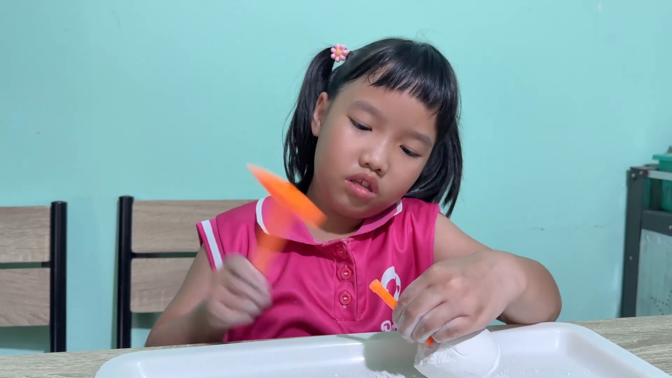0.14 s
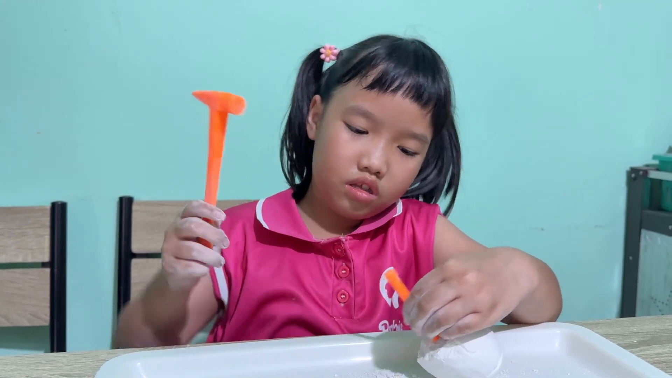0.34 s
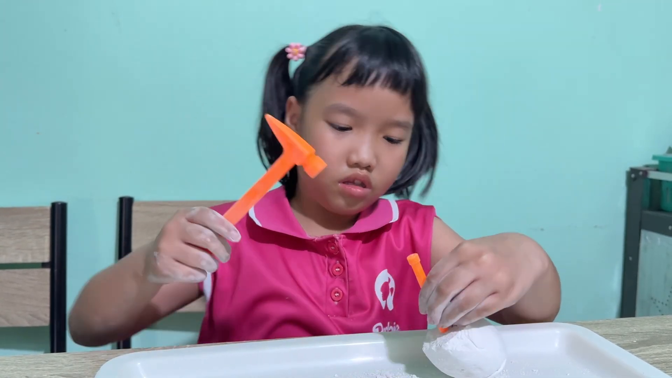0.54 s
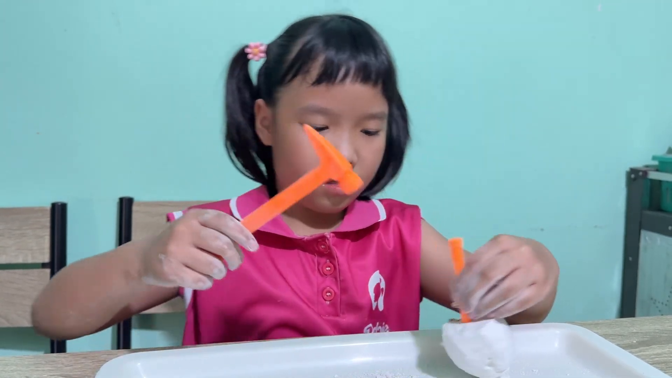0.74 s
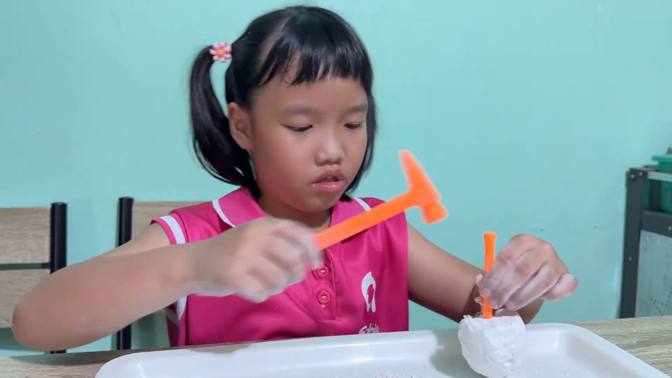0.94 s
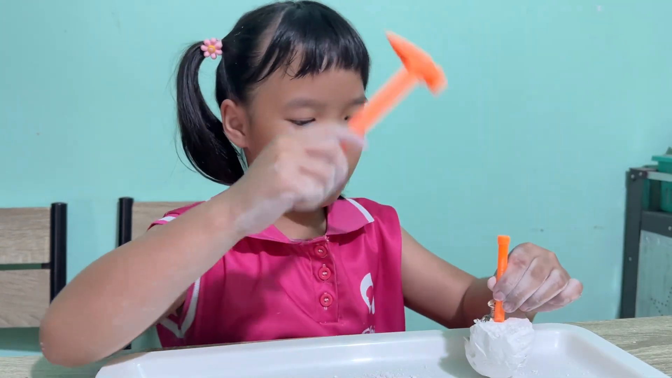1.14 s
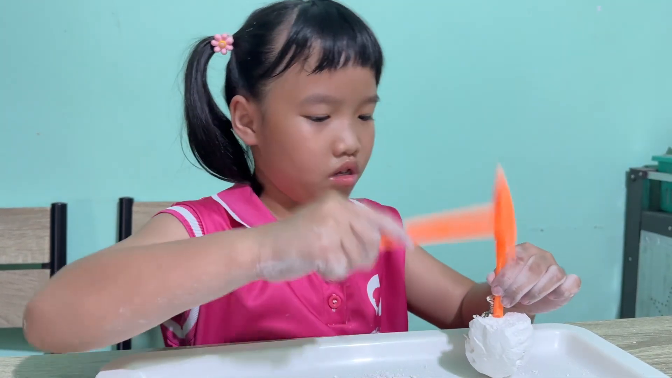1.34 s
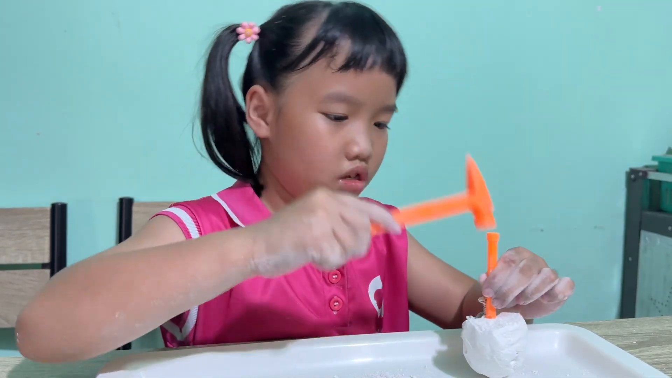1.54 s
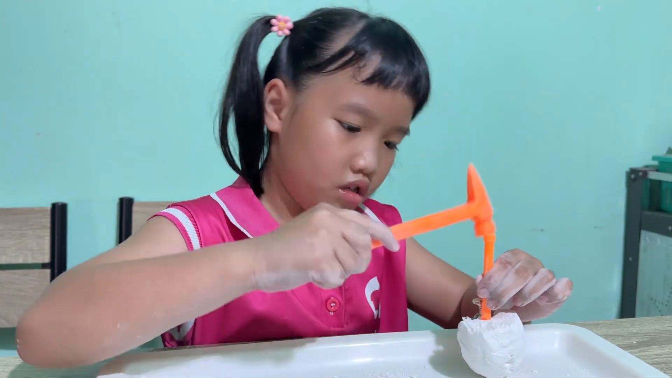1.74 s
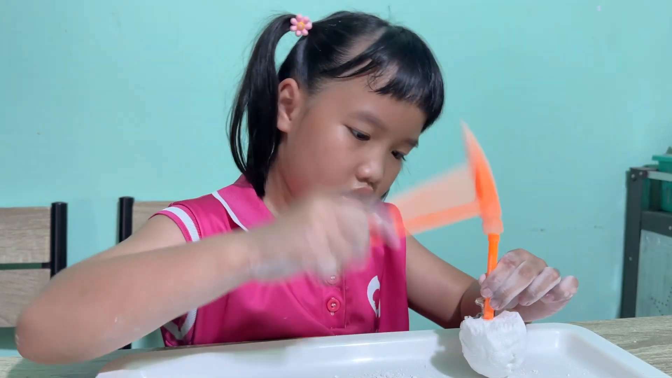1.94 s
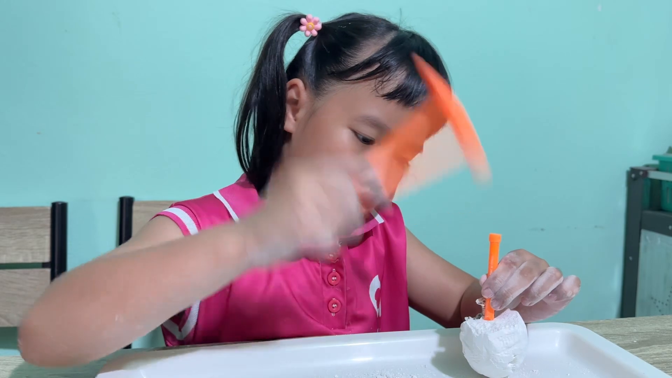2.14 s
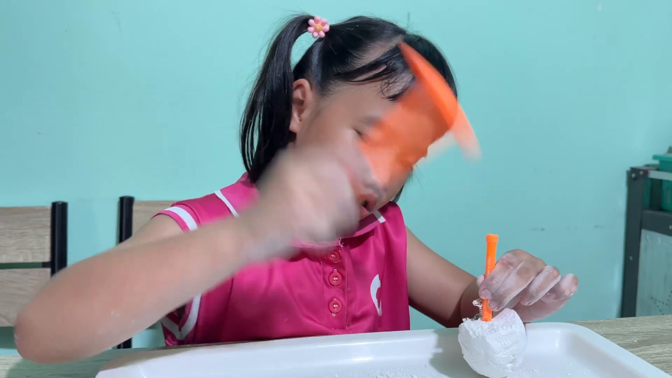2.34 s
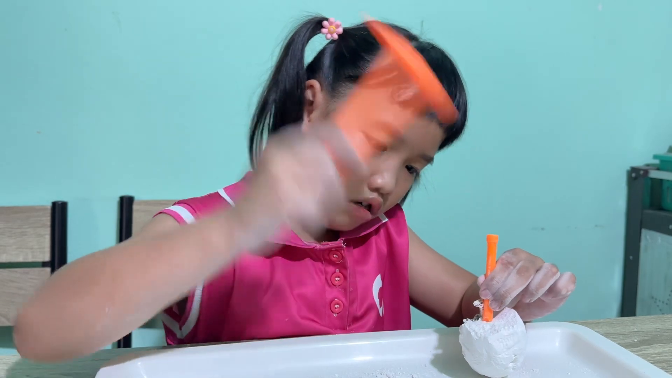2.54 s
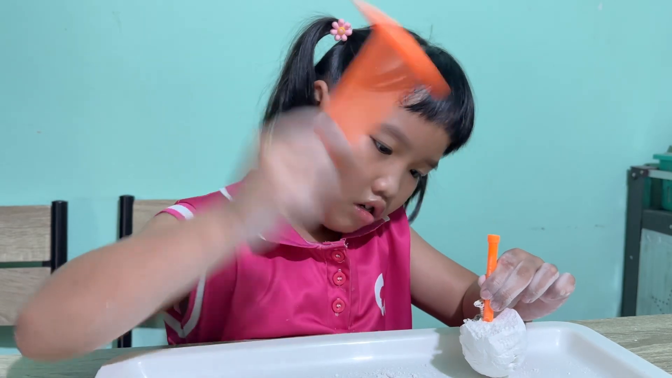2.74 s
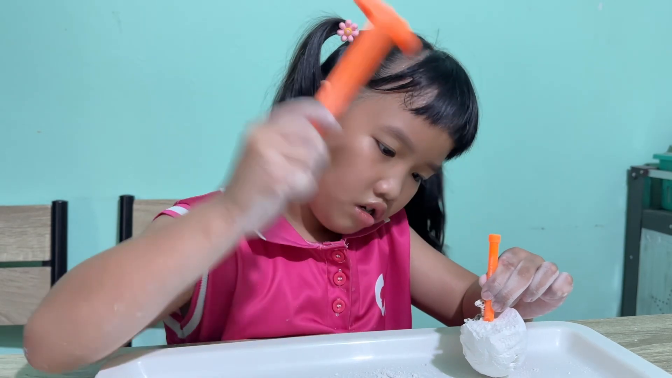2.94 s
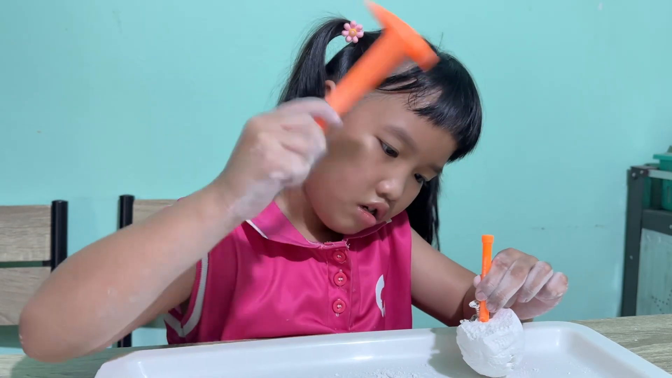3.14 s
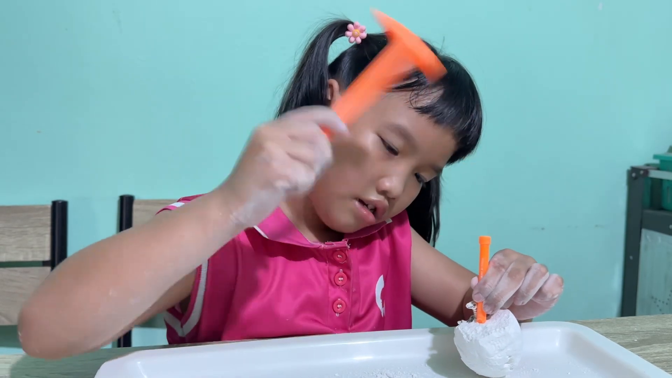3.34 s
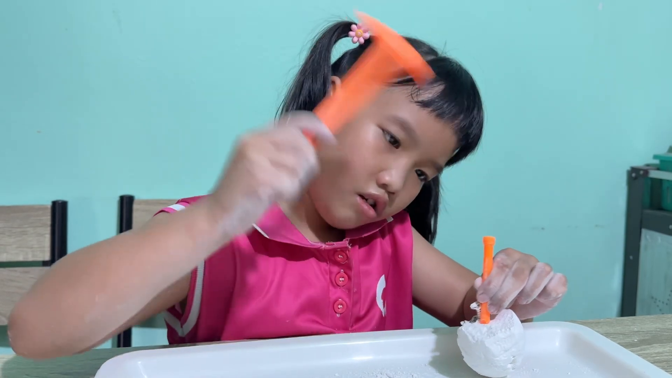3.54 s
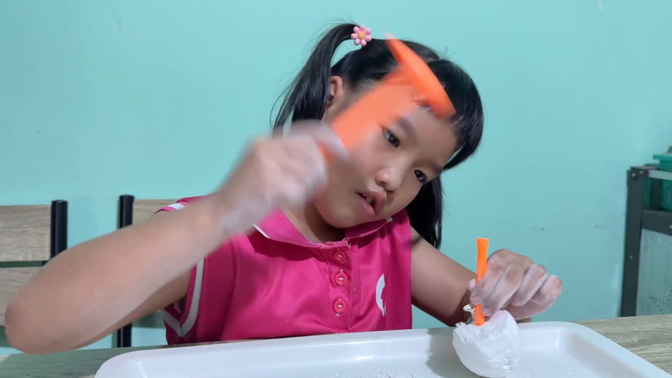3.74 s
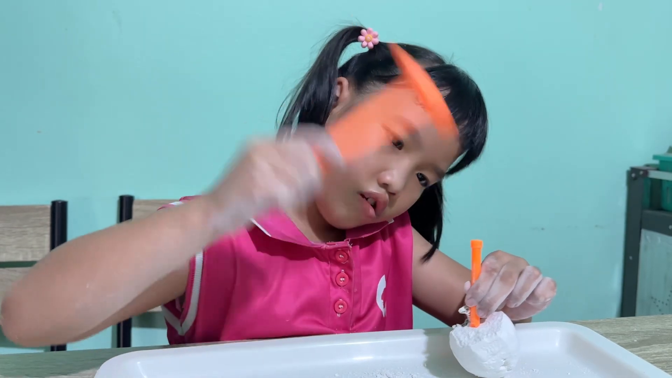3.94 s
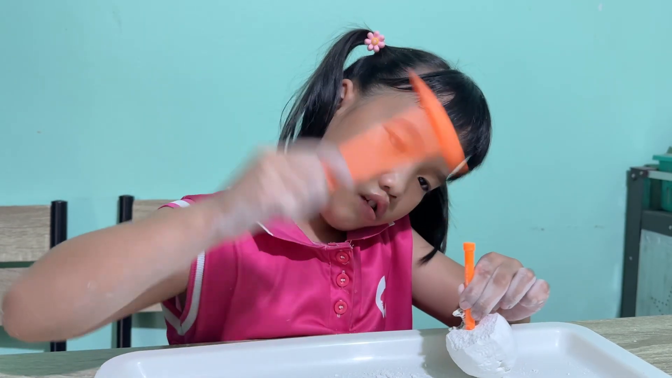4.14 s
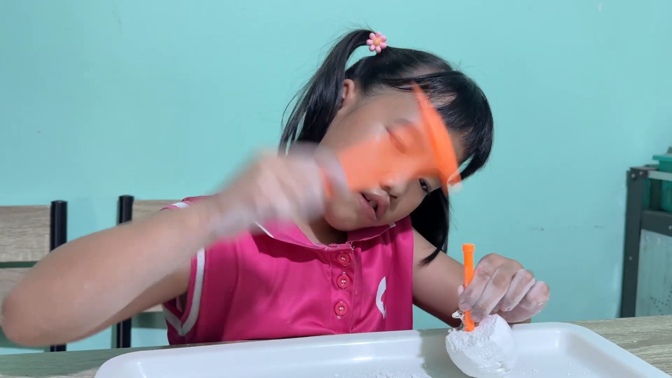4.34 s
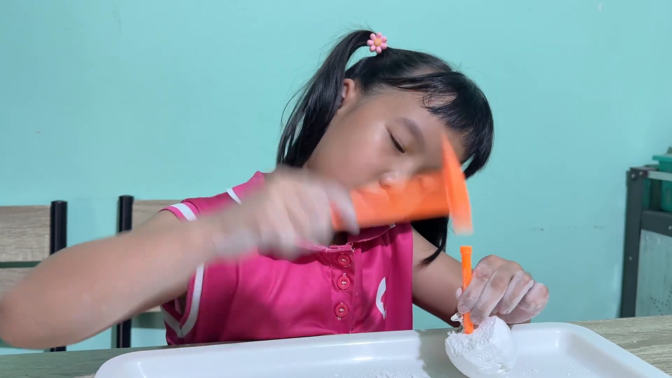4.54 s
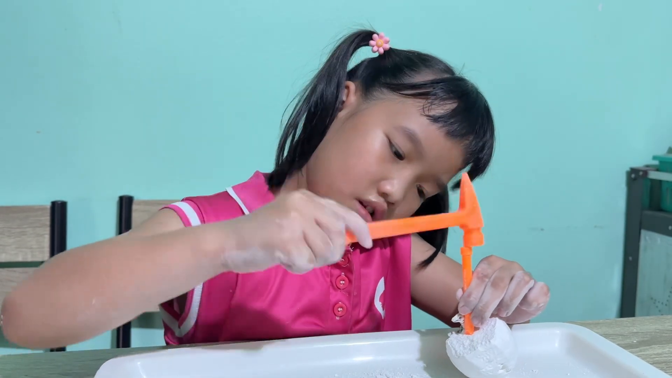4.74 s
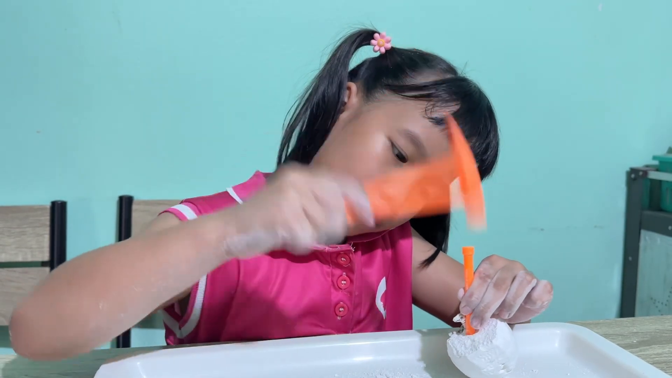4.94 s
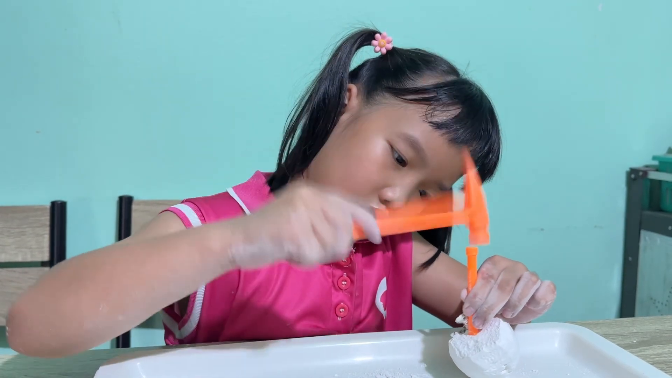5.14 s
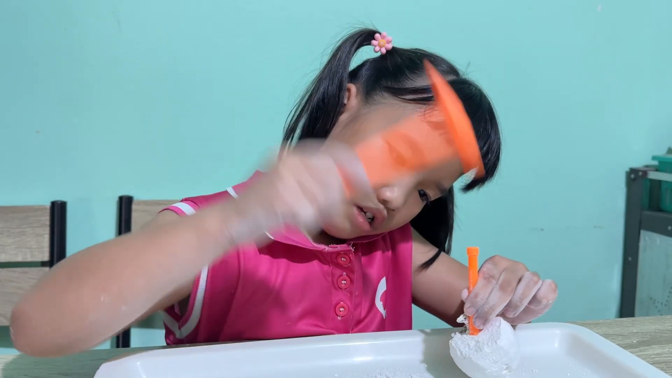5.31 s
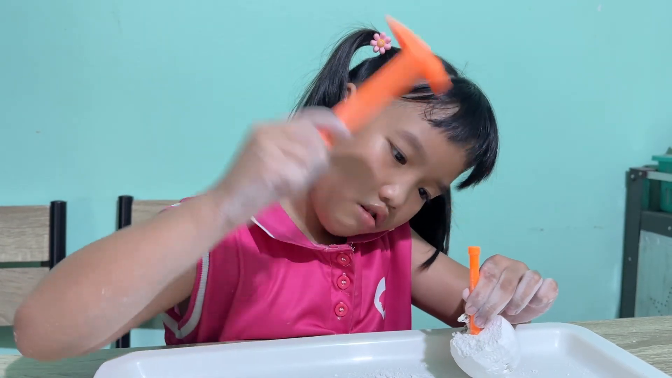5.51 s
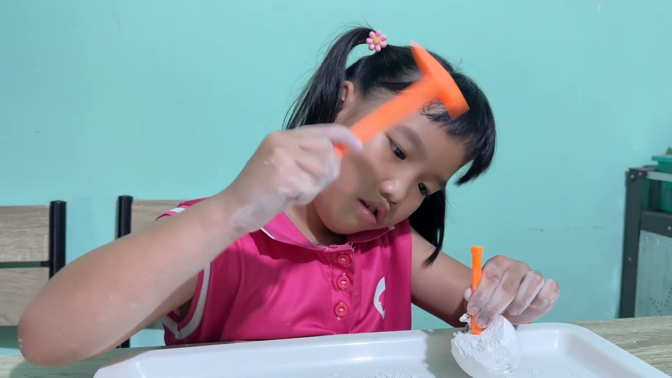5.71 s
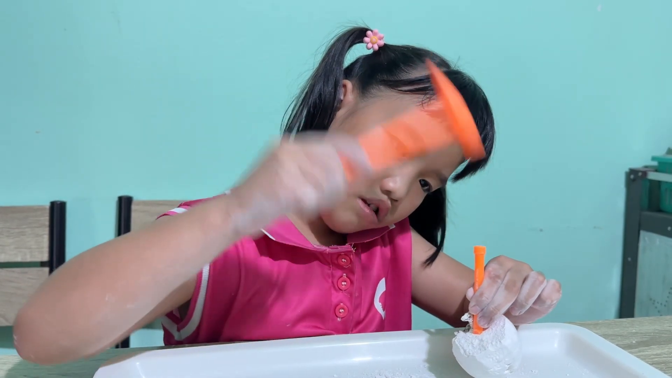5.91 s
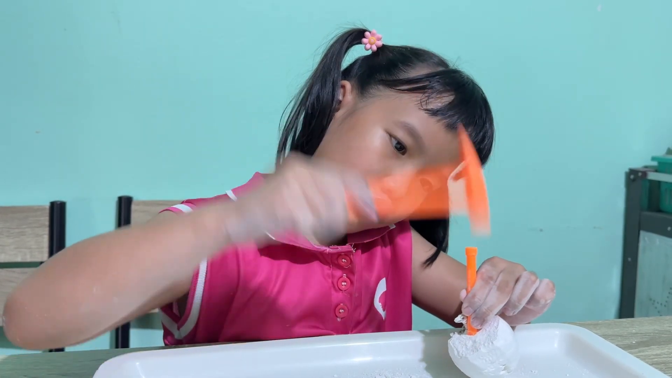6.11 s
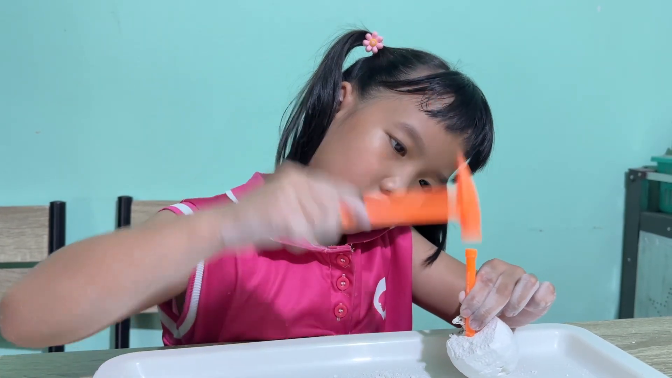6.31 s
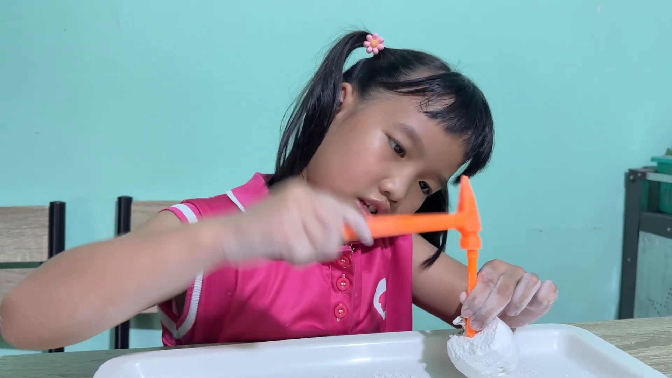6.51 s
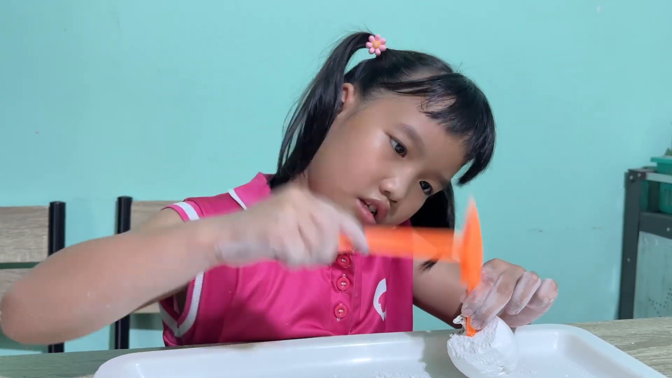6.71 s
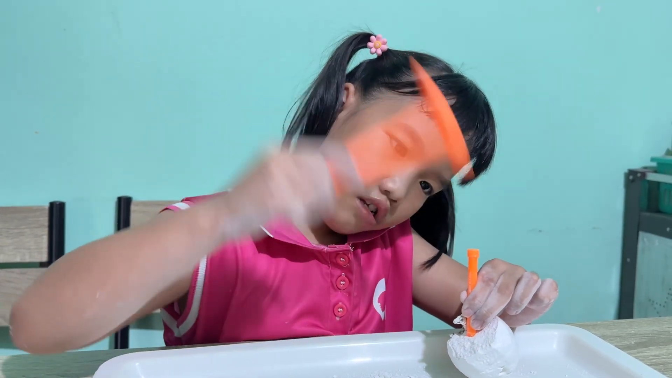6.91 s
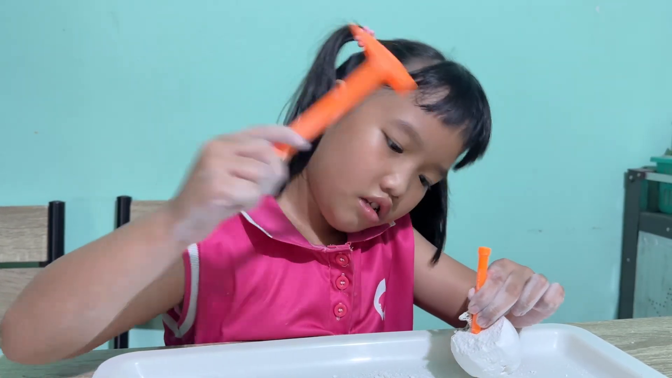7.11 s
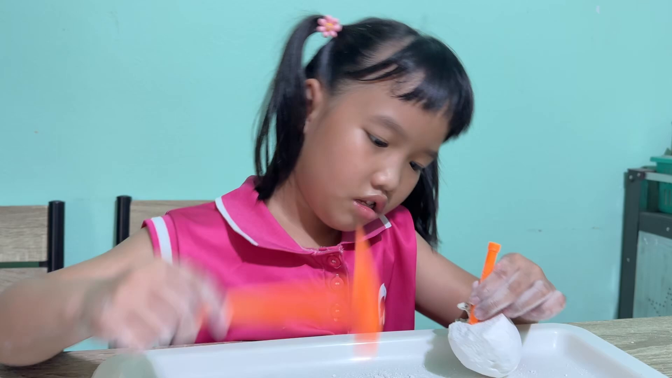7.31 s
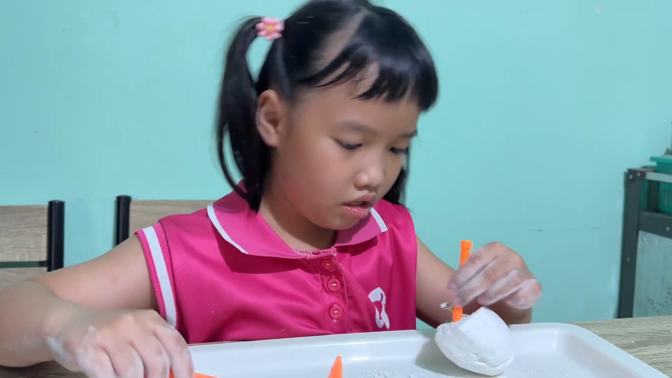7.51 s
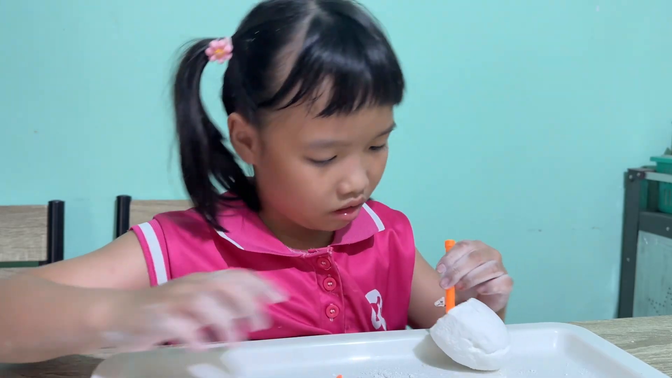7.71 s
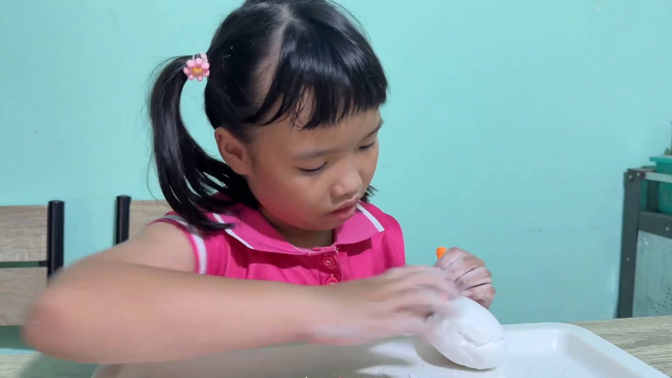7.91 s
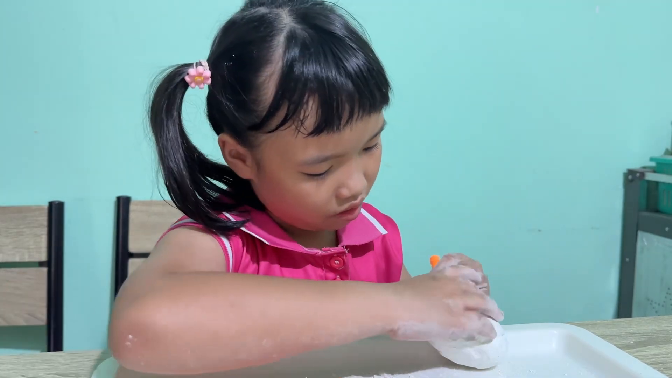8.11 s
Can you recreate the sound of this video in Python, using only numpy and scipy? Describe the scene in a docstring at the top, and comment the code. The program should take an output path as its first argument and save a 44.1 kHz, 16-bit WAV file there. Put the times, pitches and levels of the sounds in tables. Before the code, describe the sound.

Brisk hollow plastic taps on a chisel held against a plaster egg, about five per second, over faint room hum, ending in loose knocks.

```python
"""Over room air and a motor hum, a toy plastic hammer taps a plastic chisel held on a plaster egg in a plastic tray.
Each tap sums decaying modes: a dry click of the tools, a hollow knock of the tray and a thud of the table top.
After the first tap the egg is shifted with a dull rub of filtered noise; the taps then go on, the egg settling.
Loose knocks, each with faint later touches, sound once among the taps and at the end as the hammer is put down.
A small bare room answers taps and knocks with a tail of decaying noise."""
import sys
import numpy as np
from scipy import signal
from scipy.fft import rfft, irfft
from scipy.io import wavfile
from scipy.ndimage import uniform_filter1d

SR = 44100
rng = np.random.default_rng(int(sys.argv[2]) if len(sys.argv) > 2 else 0)


def log_audio(samples):
    """Write samples as a 16-bit WAV file to the path given in sys.argv[1]."""
    # one column per channel
    frames = np.atleast_2d(samples).T
    # limit to full scale, then quantise
    limited = np.clip(frames, -1, 1)
    pcm = np.round(limited * 32767).astype(np.int16)
    wavfile.write(sys.argv[1], SR, pcm)


N = 359856

# Steady room air. Each row: frequency in Hz, relative spectral density in dB per Hz.
AIR_SPECTRUM = [(15, -35), (25, -22), (54, -6.5), (71, -18.5), (106, -17.5), (125, -19.5), (207, -22),
                (224, -26.5), (301, -22), (373, -38), (1150, -34.5), (1630, -44), (6540, -58),
                (8550, -67.5), (15000, -74.5)]
# Partials of the motor hum. Each row: frequency in Hz, level in dB before panning.
HUM_PARTIALS = [(48.8, -43), (100.5, -48), (146, -57.5), (199, -61.5)]
# Stereo width set for air, rub and room tail. Each row: frequency in Hz, left-right correlation
# (limited to -1..1 when used).
STEREO_CORRELATION = [(50, 0.88), (250, 0.85), (600, 0.27), (1200, 0.31), (1800, 0.35), (3000, 0.34),
                      (6800, 0.1), (8500, -1.18), (11000, -2.5), (15000, 5.2)]
# Stereo balance set for air, rub and room tail. Each row: frequency in Hz, left-right level difference in dB.
STEREO_BALANCE = [(100, 0.5), (500, 2.5), (900, -1), (2500, 1), (4000, 2), (6000, 9), (9000, 0.5),
                  (15000, 2)]

# Taps on the chisel. Each row: start in seconds, relative force passed into the egg in dB,
# relative level of the tools' click in dB, sharpness of the click from 8 kHz up in dB.
TAPS = [(0.0381, -32.5, -30, 6.5), (1.3195, -55, -46.5, -1), (1.3503, -55, -56.5, 1),
        (1.5242, -34, -33.5, -3.5), (1.7275, -20.5, -28.5, -3.5), (1.9534, -23, -27, -2.5),
        (2.171, -23.5, -26, 0.5), (2.3766, -23.5, -26.5, 0.5), (2.5863, -19.5, -27.5, 3),
        (3.0196, -37.5, -31.5, -5), (3.238, -21, -27.5, 1.5), (3.4367, -21, -27, 1.5),
        (3.6426, -19.5, -26.5, 2), (3.8478, -17, -25.5, 1), (4.0653, -19.5, -27, 1),
        (4.2745, -20, -26.5, 4), (4.4855, -18, -25, 5.5), (4.7291, -16.5, -27.5, 1),
        (4.9673, -25.5, -38, -10), (5.1503, -18.5, -31, -1.5), (5.3499, -20.5, -29, -1),
        (6.044, -27.5, -28, 6), (6.2634, -18, -25.5, 0), (6.4801, -16.5, -26, -1),
        (6.6922, -55, -41.5, 8.5), (6.9474, -19.5, -28, -1)]
# Modes of hammer and chisel. Each row: frequency in Hz, relative energy in dB, t60 in seconds,
# left-right level difference in dB.
TOOL_MODES = [(780, -7, 0.0011, -10), (1588, -2.5, 0.013, -8.5), (1935, 1.5, .012, -4),
              (2570, -2, 0.0025, -6), (3166, -2.5, 0.0078, -1), (4357, 0.5, 0.0025, 0.5),
              (4996, 3, 0.0065, -0.5), (5580, -5.5, 0.0022, -13), (6850, 0, 0.0035, -0.5),
              (8150, -10.5, 0.0038, 1), (9060, -13.5, 0.0048, 12), (12000, -12.5, 0.00087, 16),
              (12350, -10.5, 0.006, -11), (15000, -9, 0.00347, 4.5)]
# Modes of the tray under the egg. Each row: frequency in Hz, relative energy in dB, t60 in seconds,
# left-right level difference in dB.
TRAY_MODES = [(388, -12, 0.036, -2), (516.4, -20, 0.23, -10), (530.4, 5, 0.066, -3),
              (589.4, -3, 0.0643, 1.5), (651.3, -2, 0.043, 10), (699, -16.5, 0.018, -0.5),
              (839, -17, 0.097, -7.5), (896, -19, 0.091, -15.5), (1045, -10.5, 0.029, -13),
              (1232, -12.5, 0.037, 2.5), (1700, -17.5, 0.015, -5.5), (2020, -30, 0.038, 8)]
# Modes of the table top. Each row: frequency in Hz, relative energy in dB, t60 in seconds,
# left-right level difference in dB.
TABLE_MODES = [(96, -14, 0.32, -7.5), (106.3, -5, .2, -5.5), (135.7, -3.5, 0.24, 8.5),
               (198.6, -2, 0.14, 7.5), (230.5, -9, 0.13, 13.5), (259.4, -7, 0.082, -9.5),
               (310.5, 1.5, 0.069, -0.5), (353.3, -12, 0.17, 0), (387, -12, 0.082, -21.5),
               (475.6, -8.5, 0.25, 4.5)]
# Level of the tools' modes up to about 2 kHz, which follows the grip. Each row: time in seconds, level in dB.
GRIP_LEVEL = [(0, -4.5), (1.35, -15), (1.75, -1.5), (2.4, -1.5), (3, 3), (4.5, 1.5), (5.1, 5), (6.05, 3),
              (6.7, -3.5), (6.95, 0.5)]
# Effect of the egg lying off the middle on tray and table modes. Each row: frequency in Hz, gain in dB.
OFFSET_COLOUR = [(100, 5.5), (200, 2.5), (300, -3), (420, -4.5), (520, 0), (670, -1.5), (850, -3),
                 (1300, 6)]
# After-ring of the hammer's hollow head. Each row: frequency in Hz, relative energy in dB, t60 in seconds,
# left-right level difference in dB.
HEAD_MODES = [(1722, -1.5, .07, -4), (2027, 2.5, 0.13, -8.5), (1983, 5.5, 0.14, -0.5),
              (2998, 3.5, 0.28, 8.5), (3185, -16.5, 0.15, 4)]

# Level of the room tail. Each row: frequency in Hz, relative gain in dB.
ROOM_GAIN = [(60, -11), (200, -4.5), (450, -2.5), (900, -1), (2000, -5.5), (4000, -3), (6500, -6),
             (9000, 3), (12000, 1), (16000, -4.5)]
# Decay of the room tail. Each row: frequency in Hz, t60 in seconds.
ROOM_T60 = [(100, 0.38), (500, 0.41), (2000, 0.39), (5000, 0.43), (9000, 0.38), (15000, 0.25)]
# Rub of the shifted egg. Each row: frequency in Hz, relative spectral density in dB per Hz.
RUB_SPECTRUM = [(50, -33), (110, -1.5), (180, -4.5), (260, -16), (600, -15.5), (1500, -36), (4000, -60),
                (12000, -74)]
# Loose knocks on the table, loudest when the hammer is laid down. Each row: start in seconds, level in dB,
# hardness of the contact as the gain of the modes above 3.5 kHz in dB.
KNOCKS = [(5.8129, -42.5, -5), (7.394, -26.5, -12), (7.5946, -26, 0), (7.7391, -39.5, -9.5),
          (7.802, -49.5, -9.5)]
# Modes of the loose hammer on the table top. Each row: frequency in Hz, relative energy in dB,
# t60 in seconds, left-right level difference in dB.
HAMMER_MODES = [(116, -2, 0.1, 1.5), (199, -6, 0.025, -9), (394, -4, 0.024, -4.5), (512, -6.5, 0.088, -9),
                (737, -12, 0.018, -11), (1070, -5.5, 0.038, -3), (1255, -8.5, 0.021, -15.5),
                (1910, -8, 0.006, -18), (2058, -8, 0.045, -14.5), (2306, -16, 0.011, -22),
                (3500, 4.5, 0.0024, 9.5), (4500, 0.5, 0.0036, 9.5), (5630, -2.5, 0.0065, 6),
                (7460, -7.5, 0.005, 2), (12100, -16, 0.00083, -24)]

TAP_TIME = np.arange(SR // 2) / SR   # seconds
RIGHT_LEAD_S = 0.000042   # the tools are nearer the right channel

# A square blow drives the egg down; the weaker a blow, the more it glances off the chisel.
SQUARE_DB, GLANCING_DB = -22, -26.5   # force of a fully square and of a fully glancing blow
SQUARE_TILT_DB, GLANCING_TILT_DB = 0.5, 6   # slope of the tray's knock, dB per octave
SQUARE_CLACK_DB, GLANCING_CLACK_DB = 1.5, 5.5   # gain of the tools near 3 kHz, before the grip's share
CLACK_FOLLOWS_GRIP = 0.6   # share of the grip's dB that reaches the modes near 3 kHz
SETTLE_FROM_S, SETTLED_S = 2.2, 3.7   # the egg comes to the middle of the tray

RUB_AT_S, RUB_HOLD_S, RUB_DB = 1.078, 0.067, -47.5
RUB_RISE_DB_PER_S, RUB_FALL_DB_PER_S = 560, 162

TOUCH_SPAN_S, TOUCH_DB, TOUCH_THINNING = 0.078, -27, 2.5   # faint touches after each loose knock
SOFT_WEIGHT = 0.49   # dB that the bass gains for each dB of treble that a soft contact loses
KNOCK_TOP_DB = -7   # further gain of every knock at 12 kHz
CUTOFF_HZ = 15900


def from_db(db):
    """A level in decibels is twenty times the logarithm of the amplitude ratio."""
    return 10 ** (np.asarray(db) / 20)


def rms_one(x):
    """Mean power sets the level of steady noise: scale to rms 1."""
    return x / np.sqrt(np.mean(x ** 2) + 1e-20)


def blow_one(x):
    """Total energy sets the level of a transient: scale a stereo blow to that of 30 ms at rms 1."""
    return x / np.sqrt(np.sum(x ** 2) / (2 * 0.03 * SR))


def at_hz(points, hz):
    """Spectra are interpolated linearly on a logarithmic frequency axis."""
    points = np.array(points)
    return np.interp(np.log(hz), np.log(points[:, 0]), points[:, 1])


def frequencies(modes):
    """Modal frequencies in Hz, the first column of a mode table."""
    return np.array(modes)[:, 0]


def pan(db):
    """A level difference between left and right is shared equally by the two gains."""
    return from_db([[db / 2], [-db / 2]])


def ramp(x, start, end):
    """A linear transition: 0 up to start, 1 from end on."""
    return np.clip((x - start) / (end - start), 0, 1)


def drift(rate):
    """Slow random wander: straight lines between normal random knots, about rate knots per second."""
    knots = rng.standard_normal(int(rate * N / SR) + 2)
    return np.interp(np.linspace(0, len(knots) - 1, N), np.arange(len(knots)), knots)


def add(out, sound, s):
    """Superposition: mix a sound in at time s."""
    start = max(round(s * SR), 0)
    out[:, start:start + sound.shape[1]] += sound[:, :N - start]


def stereo_bands(size):
    """Noise bands with a chosen left-right correlation, from alike to opposed: yield (centre Hz, stereo noise)."""
    edges = np.geomspace(24, 17500, 20)   # about half an octave per band
    white = rng.standard_normal((2, 2, size + SR // 4))   # the first quarter second lets the filters settle
    for k, (low, high) in enumerate(zip(edges, edges[1:])):
        band_pass = signal.butter(2, [low, high], "band", fs=SR, output="sos")
        mid, side = signal.sosfilt(band_pass, white[k % 2])[:, -size:]
        hz = np.sqrt(low * high)
        alike = np.clip(at_hz(STEREO_CORRELATION, hz), -1, 1)
        common = np.sqrt((1 + alike) / 2) * mid
        opposed = np.sqrt((1 - alike) / 2) * side * [[1], [-1]]
        yield hz, (common + opposed) * pan(at_hz(STEREO_BALANCE, hz))


def coloured_noise(spectrum, bands):
    """A noise spectrum is the sum of its bands, each weighted by the spectral density."""
    return sum(from_db(at_hz(spectrum, hz)) * band for hz, band in bands)


def room_air(bands, air_db):
    """Steady broadband noise fills the room; its level is set by the part above 130 Hz."""
    air = coloured_noise(AIR_SPECTRUM, bands)
    high_pass = signal.butter(2, 130, "high", fs=SR, output="sos")
    return from_db(air_db) * air / np.std(signal.sosfilt(high_pass, air))


def motor_hum(waver, hum_pan_db):
    """A motor hums at near-harmonic partials whose amplitude and phase waver."""
    t, hum = np.arange(N) / SR, 0
    for hz, db in HUM_PARTIALS:
        amplitude = from_db(db) * np.sqrt(2) * (1 + waver * drift(13))
        phase_drift = waver * hz / HUM_PARTIALS[0][0] * drift(8.6)
        hum = hum + amplitude * np.sin(2 * np.pi * hz * t + phase_drift)
    return hum * pan(hum_pan_db)


def mode_rings(modes, lead_s=0, sign=1):
    """A struck body rings in exponentially decaying modes; the right channel may hear them earlier.

    The gain sign ** k of mode k, if negative, opposes neighbours and slightly weakens later rows."""
    t, rings = np.maximum(TAP_TIME - [[lead_s], [0]], 0), []
    for k, (hz, db, t60, pan_db) in enumerate(modes):
        # a slow decay needs less amplitude for the same energy
        envelope = from_db(db - np.minimum(60 * t / t60, 300)) / np.sqrt(t60)
        rings.append(sign ** k * envelope * np.sin(2 * np.pi * hz * t) * pan(pan_db))
    return np.array(rings)


def bending(rings, travel_s, radiate_hz):
    """Bending waves disperse, the low ones slowest (set by travel_s at 200 Hz); the lowest hardly radiate."""
    size = 2 * len(TAP_TIME)
    hz = np.fft.rfftfreq(size, 1 / SR)
    phase = 4 * np.pi * travel_s * np.sqrt(200 * hz)
    late = irfft(rfft(rings, size) * np.exp(-1j * phase))[..., :len(TAP_TIME)]
    return signal.sosfilt(signal.butter(2, radiate_hz, "high", fs=SR, output="sos"), late)


def strike(rings, spread_db, colour_db=0):
    """Modal excitation: every blow excites the modes with strengths of its own."""
    strengths = from_db(colour_db + spread_db * rng.standard_normal(len(rings)))
    return np.tensordot(strengths, rings, 1)


def crunch(click, smear_s, count=16):
    """Crushing smears a click by a random group delay up to smear_s, leaving its spectral magnitude."""
    size = 2 * click.shape[1]
    hz = np.fft.rfftfreq(size, 1 / SR)
    delay = np.interp(hz, np.geomspace(1000, SR / 2, count), smear_s * rng.random(count))
    phase = 2 * np.pi * np.cumsum(delay) * hz[1]   # phase is the integral of group delay
    return irfft(rfft(click, size) * np.exp(-1j * phase))[:, :size // 2]


def all_round(click, width_hz):
    """Radiation to every side averages the power spectrum, so peaks and notches partly even out."""
    power = np.mean(abs(rfft(click)) ** 2, axis=0)
    power = uniform_filter1d(power, max(int(width_hz * click.shape[1] / SR), 1))
    pulse = irfft(np.sqrt(np.maximum(power, 0)))
    return np.roll(pulse, SR // 1000)[None, :SR // 100]   # centred at 1 ms, cut at 10 ms


def taps(thud_db, knock_db, click_db, scatter_db):
    """An impact excites the tools, then passes through the egg into tray and table: (direct, into the room)."""
    out, radiated = np.zeros((2, N)), np.zeros((1, N))
    tools = mode_rings(TOOL_MODES, RIGHT_LEAD_S, sign=-0.98)
    tray = bending(mode_rings(TRAY_MODES), travel_s=0.00363, radiate_hz=287)
    table = bending(mode_rings(TABLE_MODES), travel_s=0.007206, radiate_hz=98)
    tool_hz, tray_hz, table_hz = map(frequencies, (TOOL_MODES, TRAY_MODES, TABLE_MODES))
    for s, force, click, sharp_db in TAPS:
        glance = ramp(force, SQUARE_DB, GLANCING_DB)
        offset = 1 - ramp(s, SETTLE_FROM_S, SETTLED_S)
        tilt = SQUARE_TILT_DB + glance * (GLANCING_TILT_DB - SQUARE_TILT_DB)
        grip_db = np.interp(s, *np.transpose(GRIP_LEVEL))
        clack_db = SQUARE_CLACK_DB + glance * (GLANCING_CLACK_DB - SQUARE_CLACK_DB)
        clack_db = clack_db + CLACK_FOLLOWS_GRIP * grip_db

        tool_colour = [(2100, grip_db), (3200, clack_db), (4300, 0), (6000, 0), (8000, sharp_db)]
        tool_db = at_hz(tool_colour, tool_hz)
        tray_db = tilt * np.log2(tray_hz / tray_hz[0]) + offset * at_hz(OFFSET_COLOUR, tray_hz)
        table_db = offset * at_hz(OFFSET_COLOUR, table_hz)

        tick = crunch(strike(tools, spread_db=2.0, colour_db=tool_db), smear_s=0.001423)
        tick = from_db(click + click_db) * blow_one(tick)
        hollow = from_db(force + knock_db) * blow_one(strike(tray, spread_db=2.2, colour_db=tray_db))
        thump = from_db(force + thud_db) * blow_one(strike(table, spread_db=1.14, colour_db=table_db))
        add(out, tick + hollow + thump, s)
        add(radiated, (hollow + thump)[1:], s)   # right channel
        add(radiated, from_db(scatter_db) * all_round(tick, width_hz=1200), s)
    return out, radiated


def head_ring(level_db):
    """Lightly damped modes of the hollow hammer head ring on briefly after each click."""
    out = np.zeros((2, N))
    ring = blow_one(mode_rings(HEAD_MODES, RIGHT_LEAD_S, sign=-0.83).sum(axis=0))
    for s, _, click, _ in TAPS:
        add(out, from_db(click + level_db) * ring, s)
    return out


def room(x, first_s, early_share, wall_db, wall_s):
    """Reverberation: near things scatter at once, the wall answers after first_s, then the tail decays."""
    t = np.arange(int(0.7 * SR)) / SR
    since_wall = np.maximum(t - first_s, 0)
    wall = 1 + from_db(wall_db) * np.exp(-since_wall / wall_s)
    swell = np.where(t < first_s, early_share, wall)
    response = 0
    for hz, band in stereo_bands(len(t)):
        decay = swell * np.exp(-np.log(1000) * t / at_hz(ROOM_T60, hz))   # 60 dB per t60
        response = response + from_db(at_hz(ROOM_GAIN, hz)) * band * decay / np.linalg.norm(decay)
    return signal.fftconvolve(x, response, axes=1)[:, :N]


def egg_rub(bands):
    """Sliding friction of the egg on the tray makes a dull noise that swells, holds and dies away unevenly."""
    t = np.arange(N) / SR
    rub = rms_one(coloured_noise(RUB_SPECTRUM, bands))
    before = np.maximum(RUB_AT_S - t, 0)
    after = np.maximum(t - RUB_AT_S - RUB_HOLD_S, 0)
    rub_db = RUB_DB - RUB_RISE_DB_PER_S * before - RUB_FALL_DB_PER_S * after + 5 * drift(45.2)
    return from_db(rub_db) * rub


def knocks(count=4):
    """Hammer and hands knock on the table; a softer contact excites less treble, and faint touches follow."""
    out, hammer = np.zeros((2, N)), mode_rings(HAMMER_MODES, sign=-0.94)
    for s, db, hard_db in KNOCKS:
        contact = [(200, -SOFT_WEIGHT * hard_db), (700, 0), (2000, 0), (3500, hard_db), (7500, hard_db),
                   (12000, hard_db + KNOCK_TOP_DB)]
        colour_db = at_hz(contact, frequencies(HAMMER_MODES))
        for k in range(count + 1):   # the knock itself, then touches at widening gaps
            touch = blow_one(crunch(strike(hammer, spread_db=2, colour_db=colour_db), smear_s=0.00106))
            touch_db = db + (TOUCH_DB if k else 0)
            add(out, from_db(touch_db) * touch, s + TOUCH_SPAN_S * (k / count) ** TOUCH_THINNING)
    return out


def scene():
    """Superposition of the background, the direct sound of all blows and the reverberation."""
    bands = list(stereo_bands(N))   # air and rub are coloured from the same noise
    background = room_air(bands, air_db=-51.5) + motor_hum(waver=0.3, hum_pan_db=2.0) + egg_rub(bands)
    tapping, radiated = taps(thud_db=-0.47, knock_db=-3.0, click_db=0.5, scatter_db=-1.0)
    hammer = knocks()
    direct = tapping + head_ring(level_db=-13.5) + hammer
    wet = room(radiated + hammer[1:], first_s=0.0087, early_share=1.0, wall_db=6.0, wall_s=0.0043)
    return direct + wet + background


def record(dry):
    """Smooth saturation rounds off the highest peaks; an elliptic low-pass cuts the top steeply."""
    rounded = dry / (1 + (dry / 0.78) ** 6) ** (1 / 6)
    return signal.sosfilt(signal.ellip(10, 0.2, 80, CUTOFF_HZ, fs=SR, output="sos"), rounded)


dry = scene()
out = record(dry)
log_audio(out)
```